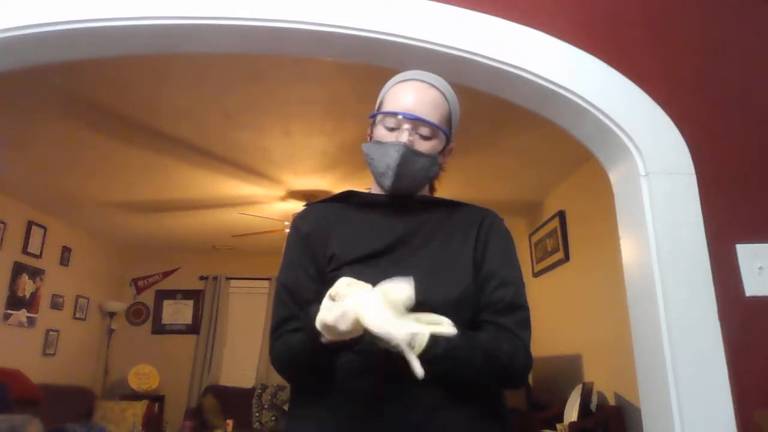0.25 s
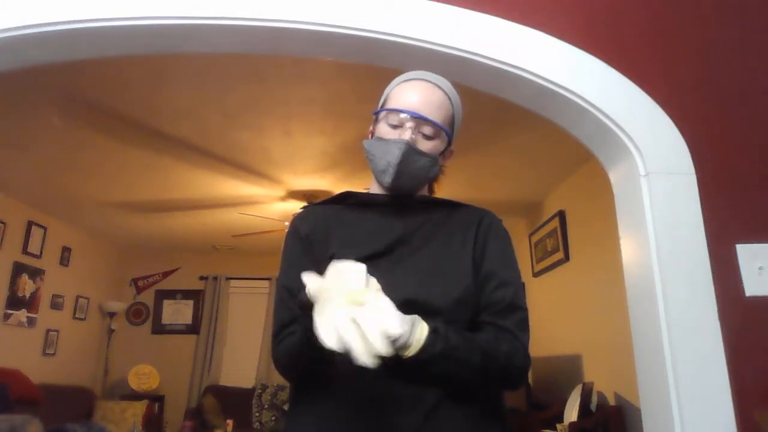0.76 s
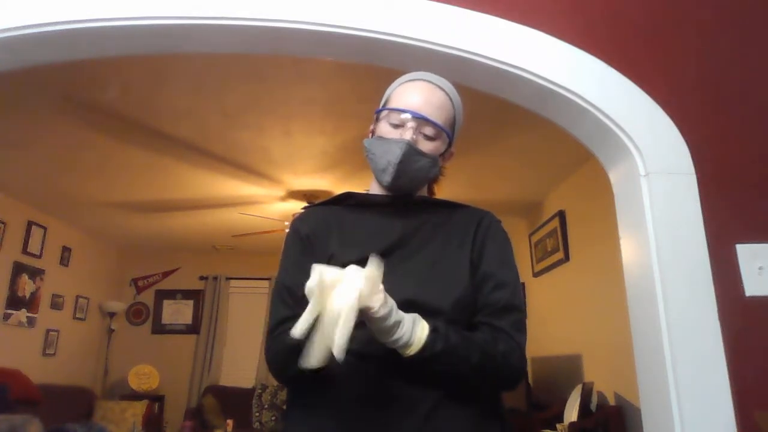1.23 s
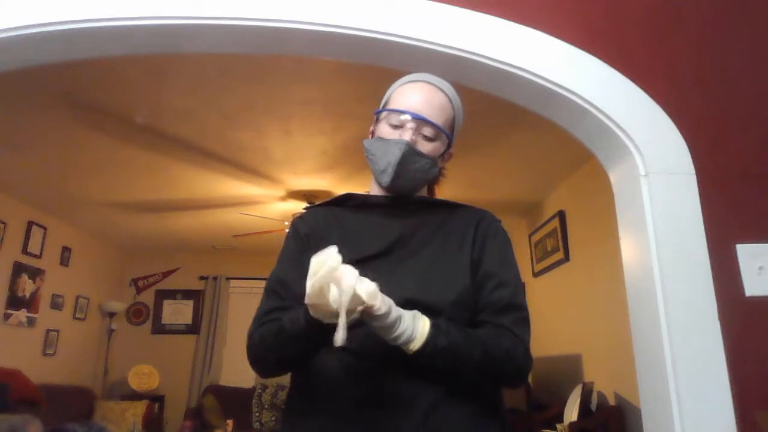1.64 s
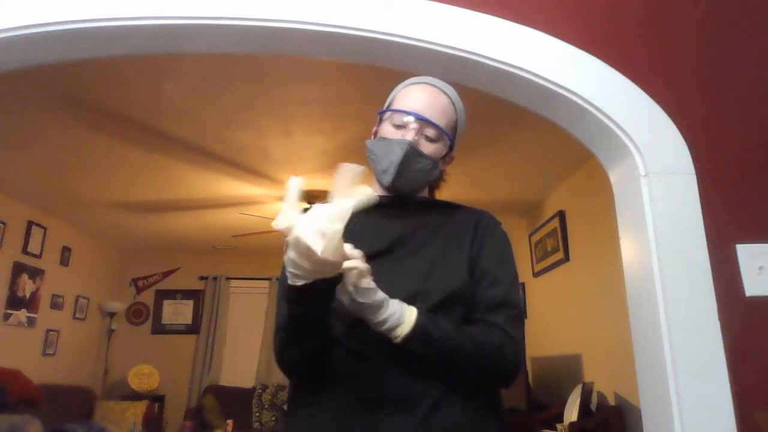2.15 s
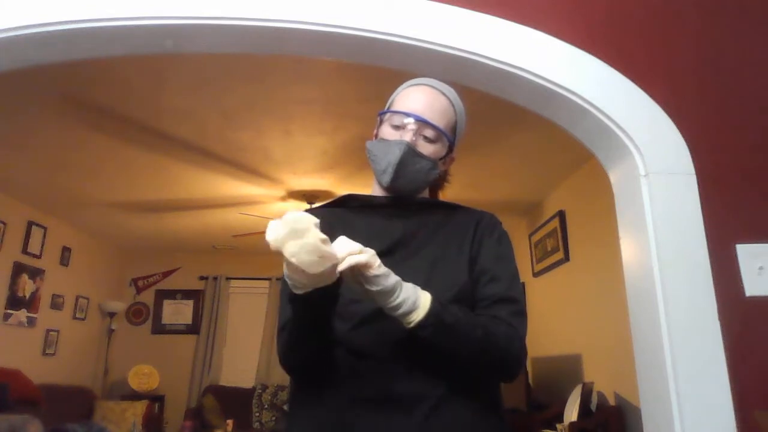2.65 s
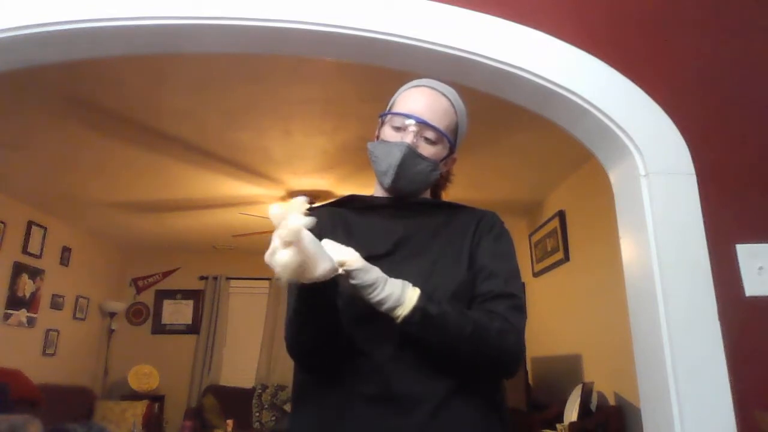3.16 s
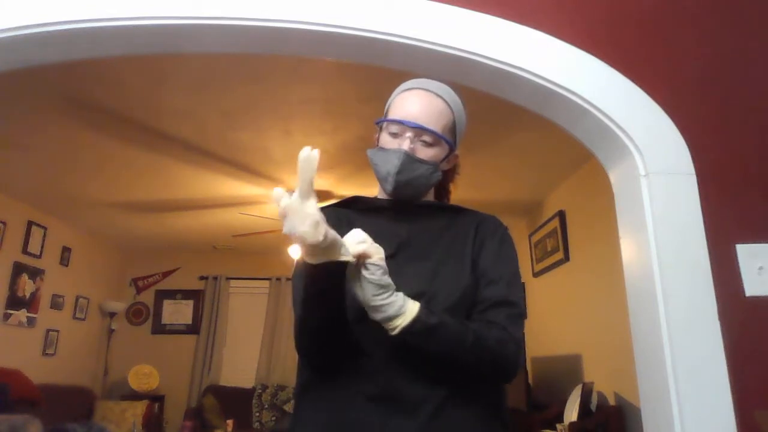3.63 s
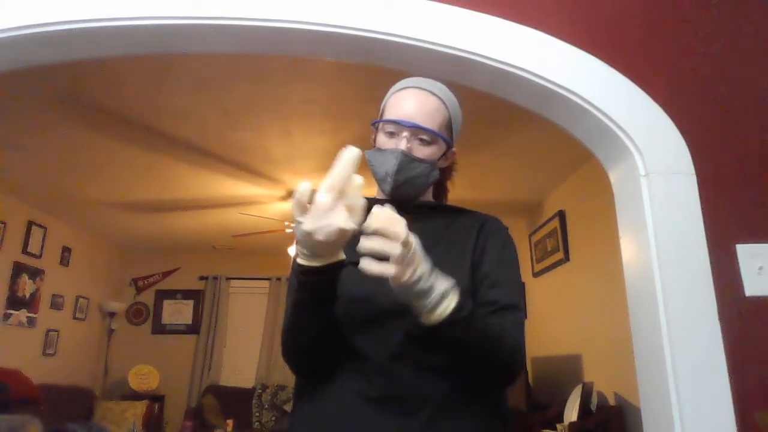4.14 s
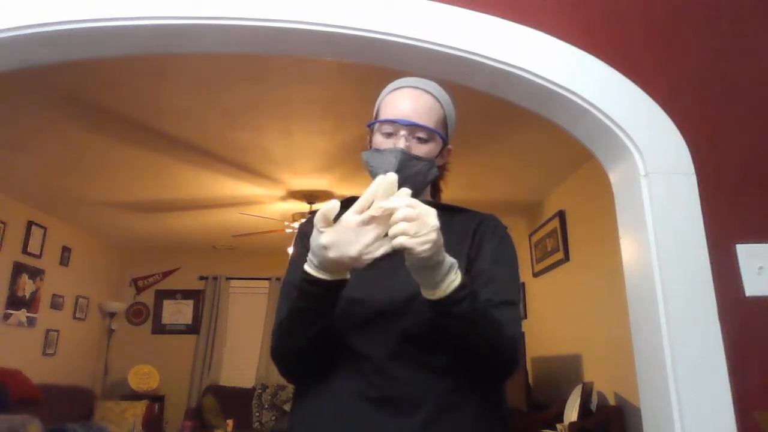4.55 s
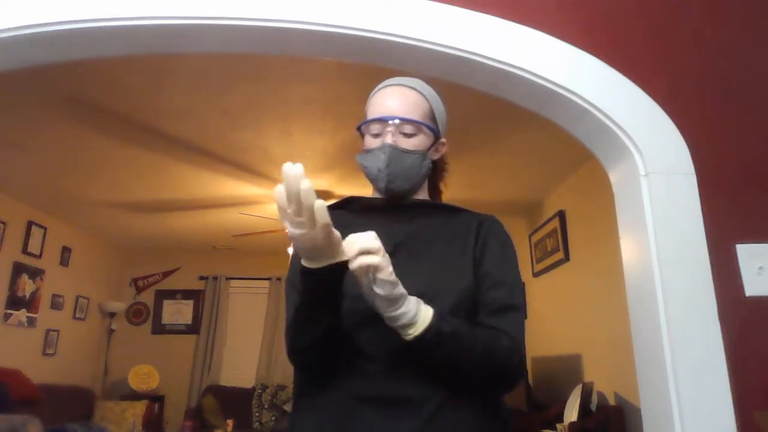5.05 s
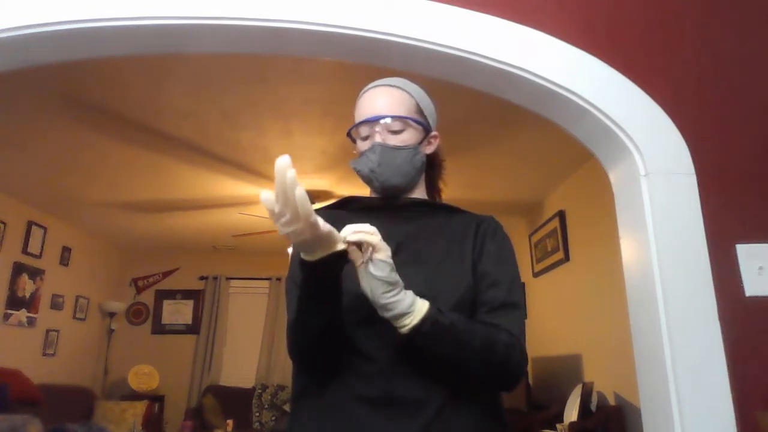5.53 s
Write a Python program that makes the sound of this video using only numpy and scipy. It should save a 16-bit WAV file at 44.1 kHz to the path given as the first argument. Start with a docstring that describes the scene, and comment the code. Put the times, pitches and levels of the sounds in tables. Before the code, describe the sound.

Thin rubber gloves hiss and crinkle as they are tugged over hands, with sharp stretchy snaps growing louder in a quiet, slightly reverberant room.

```python
"""Putting on thin rubber gloves

In a quiet living room with a low ventilation rumble, rubber slides over two hands, about a metre away.
Sliding is shaped noise with tiny random slips in it: it hisses and crinkles as each pull swells and fades.
Let go, the stretched rubber snaps back: short noise pulses with a ring and a puff, and the room rings.
Loose pockets of the glove flap softly: low notes that swell and die away."""
import sys
import numpy as np
from scipy import signal
from scipy.fft import rfft, irfft
from scipy.io import wavfile
from scipy.ndimage import uniform_filter1d

SR = 44100
rng = np.random.default_rng(int(sys.argv[2]) if len(sys.argv) > 2 else 0)


def master_out(mix):
    """Clip the mix to full scale and print it as 16-bit PCM to the path in sys.argv[1]."""
    frames = np.transpose(np.atleast_2d(mix))
    ceiling = np.clip(frames, -1, 1)
    pcm = np.round(ceiling * 32767).astype(np.int16)
    wavfile.write(sys.argv[1], SR, pcm)


N = 255515
TIME = np.arange(N) / SR


def gain_of(db):
    """Turns decibels into amplitude."""
    return 10 ** (np.asarray(db) / 20)


def evened(x):
    """Scales a sound to an rms (average strength) of 1."""
    return x / np.sqrt(np.mean(x ** 2) + 1e-20)


def read(points, hz):
    """Reads a table between its points, on a log-frequency axis."""
    f, value = np.transpose(points)
    return np.interp(np.log(hz + 1), np.log(f + 1), value)


def add(mix, s, sound):
    """Mixes a sound in, starting at s seconds."""
    part = mix[round(s * SR):][:len(sound)]
    part += sound[:len(part)]


def coloured(x, points):
    """Gives a full-length signal the colour of a spectrum table, at rms 1."""
    hz = np.fft.rfftfreq(N, 1 / SR)
    return evened(irfft(rfft(x) * gain_of(read(points, hz)), N))


def wander(per_s):
    """Smooth random drift of rms 1; a higher per_s (in Hz) drifts faster."""
    f = np.fft.rfftfreq(N, 1 / SR)
    slow = np.exp(-(f / per_s) ** 2)
    return evened(irfft(rfft(rng.standard_normal(N)) * slow, N))


def bump(hz, centre, octaves):
    """A resonance: a smooth peak of height 1 around a centre frequency."""
    return np.exp(-(np.log2(hz / centre) / octaves) ** 2)


# colour of the low rumble: f/Hz, relative level/dB
RUMBLE_COLOUR = [(15, -71), (25, -57), (70, -21), (88, -14.5), (108, -1.5), (135, -3), (172, -2.5),
                 (216, -11), (243, -18), (313, -22), (372, -16.5), (442, -29.5), (600, -39), (780, -46),
                 (1320, -120)]
# colour of the wash of air: f/Hz, relative level/dB
AIR_COLOUR = [(25, -30), (100, 1), (400, 0.5), (800, -2), (2000, -2.5), (6000, -8), (16000, -51)]


def ventilation(rumble_db=-53, hum_hz=109, hum_db=-59, sway=0.77, air_db=-68):
    """A low rumble with a hum that wavers in pitch and loudness, and a faint wash of air."""
    phase = 2 * np.pi * hum_hz * TIME + sway * wander(8.7)
    hum = evened(np.sin(phase) * (1 + sway * wander(14.4)))
    rumble = coloured(rng.standard_normal(N), RUMBLE_COLOUR)
    air = coloured(rng.standard_normal(N), AIR_COLOUR)
    return gain_of(rumble_db) * rumble + gain_of(hum_db) * hum + gain_of(air_db) * air


# the hands never quite let go: a light, continuous contact goes on, now stronger, now weaker
# (before the trims in sliding): t/s, hiss level/dB, duller rub level/dB
LIGHT_CONTACT = [(0, -47.5, -56.5), (1.1, -55.5, -61.5), (2.499, -57, -60), (2.75, -49.5, -54),
                 (3.4, -48, -54), (4.3, -58, -56.5), (5.101, -63, -61), (5.4, -62, -58), (5.7, -67, -60.5)]
# pulls that drag the rubber over the skin (before the trims in sliding):
# fastest moment t/s, swell time t/s, hiss level/dB, duller rub level/dB
PULLS_OVER_SKIN = [(.02, 0.053, -39, -69), (.30, 0.03, -43.5, -63), (0.492, 0.069, -39.5, -73),
                   (.62, 0.042, -45.5, -56.5), (.79, 0.064, -47.5, -57.5), (.97, 0.026, -46.5, -65),
                   (1.32, 0.14, -42, -60), (1.53, 0.13, -52, -57.5), (1.87, 0.054, -46.5, -61),
                   (1.95, 0.033, -51.5, -65), (2.1, 0.044, -38, -56), (2.188, 0.046, -36.5, -62),
                   (2.94, 0.061, -36, -71), (3.022, 0.079, -35, -52), (3.145, 0.028, -30, -48),
                   (3.201, 0.039, -30.5, -46), (3.319, 0.037, -39.5, -47.5), (3.58, 0.06, -44, -51.5),
                   (4.0, .09, -49.5, -53.5), (4.49, 0.04, -73, -51), (4.61, 0.075, -51.5, -52.5),
                   (4.85, 0.089, -47, -48.5), (5.71, 0.078, -56, -62)]
RELEASE = 1.24  # a pull dies away over this many swell times


def friction(rise_shape=1.46, fall_shape=1.17):
    """Strength of hiss and rub: each pull swells and dies away on top of the light contact."""
    times, *levels = np.transpose(LIGHT_CONTACT)
    power = gain_of([np.interp(TIME, times, db) for db in levels]) ** 2
    for s, swell, hiss_db, rub_db in PULLS_OVER_SKIN:
        u = (TIME - s) / swell  # negative before the fastest moment
        rise = abs(u) ** rise_shape
        fall = abs(u / RELEASE) ** fall_shape
        speed = np.exp(-np.where(u < 0, rise, fall))
        power = power + (gain_of([[hiss_db], [rub_db]]) * speed) ** 2
    return np.sqrt(power)


# colour of the bright hiss: f/Hz, relative level/dB
HISS_COLOUR = [(800, -62), (2200, -11), (3050, -15.5), (3750, -5.5), (5000, -4), (7000, -2), (8900, -3),
               (10300, -9.5), (12500, -8.5), (14200, -7), (16000, -14.5)]
# colour of the duller rub: f/Hz, relative level/dB
RUB_COLOUR = [(200, -27), (500, -10.5), (750, -5.5), (1200, 1), (1800, 4.5), (2400, 0.5), (3100, 0.5),
              (4000, 0), (6000, -29), (10000, -42)]


def sliding(hiss_db=-1, rub_db=-3, slips_per_s=2200, spread_db=3.0, crinkle=0.53):
    """Countless tiny slips make a hiss; larger ones stand out as crinkles, and the grip varies."""
    hiss_strength, rub_strength = friction()
    sizes = gain_of(spread_db * np.minimum(rng.exponential(1, N), 5))
    signed_sizes = sizes * rng.choice([-1, 1], N)
    happens = rng.random(N) < slips_per_s / SR
    slips = evened(signed_sizes * happens)
    grip = gain_of(0.6 * wander(45))
    # hiss and rub share the larger slips, each over its own noise
    hiss = coloured(rng.standard_normal(N) + crinkle * slips, HISS_COLOUR)
    rub = coloured(rng.standard_normal(N) + crinkle * slips, RUB_COLOUR)
    hiss = hiss * hiss_strength * gain_of(hiss_db)
    rub = rub * rub_strength * gain_of(rub_db)
    return grip * (hiss + rub)


# how fast the room's tail dies, by pitch: f/Hz, time to fall by 60 dB t/s
ROOM_DECAY = [(150, 1), (500, 0.79), (1500, 0.51), (4000, .42), (8000, 0.39), (15000, 0.21)]
# first reflections, from the archway and floor: delay t/s, gain (before the echo and room levels)
FIRST_ECHOES = [(.0049, .36), (.0058, 0.24), (.0068, 0.23), (0.0096, 0.28), (0.0131, .2)]


def room(wet_db, tail_db=4, echo_db=-3, gap=0.0041, early=0.41, early_fade=0.06):
    """Direct sound, a few reflections, then a dense tail whose bands die at their own speeds."""
    size = SR * 3 // 4
    hz, t, bands = signal.stft(rng.standard_normal(size), SR, nperseg=256)
    fading = gain_of(-60 * t / read(ROOM_DECAY, hz)[:, None])
    tail = signal.istft(bands * fading, SR, nperseg=256)[1][:size]
    t = np.arange(size) / SR
    # near walls crowd the start of the tail, which begins after a gap in seconds
    tail = tail * (t > gap) * (1 + early * np.exp(-t / early_fade))
    response = gain_of(wet_db + tail_db) * tail / np.linalg.norm(tail)
    response[0] += 1  # the direct sound
    for delay, gain in FIRST_ECHOES:
        response[round(delay * SR)] += gain * gain_of(wet_db + echo_db)
    return response


def causal(db):
    """Spectrum of the promptest pulse that has these levels."""
    mirrored = np.concatenate([db, db[-2:0:-1]])
    log_gain = np.log(gain_of(mirrored))
    return np.exp(np.conj(signal.hilbert(log_gain)))[:len(db)]


# basic colour of the snapping film of rubber: f/Hz, relative level/dB
FILM_COLOUR = [(40, -53), (150, -34), (400, -19.5), (750, -6.5), (1300, 0.5), (2300, 0.5), (3000, -2),
               (3900, 3), (5000, 1), (8800, 2), (11000, -1.5), (15000, 2)]
# pockets of air squeezed out under the film: f/Hz, width/octaves, level/dB (added to each snap's thump)
AIR_POCKETS = [(250, 0.34, 6), (410, 0.19, 2.5), (591, 0.23, 2), (960, 0.22, -8.5)]
SLAP_S = 0.00036  # time that the film takes to land


def snap(level_db, ring_hz, ring_db, thump_db, edge_hz,
         ring_octaves=0.37, scatter=0.2, scatter_fade=0.0038, steepness=4.9):
    """The film lands in a quick run of tiny slaps, rings briefly and squeezes out a puff of air."""
    size = 2048
    t = np.arange(size) / SR
    hz = np.fft.rfftfreq(size, 1 / SR) + 1  # 1 Hz up, to keep clear of zero
    landing = np.sqrt(t / SLAP_S) * np.exp(-t / SLAP_S)
    scattered = scatter * np.exp(-t / scatter_fade)  # hands and chest scatter the slap
    slaps = rfft(rng.choice([-1, 1], size) * (landing + scattered))
    # all bands are excited about alike
    slaps = slaps / np.sqrt(uniform_filter1d(abs(slaps) ** 2, size=21))
    film = gain_of(read(FILM_COLOUR, hz) + ring_db * bump(hz, ring_hz, ring_octaves))
    film = film / np.sqrt(1 + (hz / edge_hz) ** steepness)  # treble falls away above the edge
    puff = sum(gain_of(thump_db + db) * bump(hz, centre, width) for centre, width, db in AIR_POCKETS)
    pulse = irfft(slaps * causal(20 * np.log10(film + puff)))
    return gain_of(level_db) * pulse[:size // 2]


# stretched rubber slapping the skin, and a short squeak (the row at 1.3 s with an 880 Hz ring): # t/s, level/dB
# (before the shared lift in snaps), ring of the film f/Hz, # ring level/dB, thump of trapped air level/dB,
# treble edge f/Hz, room share level/dB
RUBBER_SNAPS = [(0.0101, -26.5, 6550, 13.5, -9, 14100, 0), (0.508, -19, 4650, 14, -23, 11100, -4),
                (0.522, -23, 4020, 2, -15, 9200, -10), (0.538, -24, 1600, 7, -10, 4000, -13),
                (0.6367, -24.5, 4200, 13.5, -16, 5000, -7.5), (1.285, -19, 1930, 4, -11, 5000, -0.5),
                (1.3, -28, 880, 24.5, -7, 4500, -5.5), (1.321, -27.5, 1550, 13.5, 1, 3000, -3),
                (1.376, -17, 5840, 8, -27, 8200, -5), (2.126, -26, 7600, 15, -32, 15000, 1),
                (2.1604, -12, 2400, 5, -16, 11140, -1), (2.164, -20, 7000, 15.5, -22, 11100, -6),
                (2.6028, -16, 2300, 10, -11, 9300, -2.5), (2.604, -21, 3040, 18, -18, 3520, -5),
                (3.7546, -15, 8800, 2.5, -17, 15500, -7), (3.764, -12.5, 3980, -1.5, -16, 12000, -2),
                (3.7926, -6.5, 1960, 3.5, -10, 12000, -7), (3.806, -2.5, 2040, 4, -29, 14900, -5.5),
                (3.8782, -11.5, 2650, 3, -4.5, 6760, -10), (4.0500, -4.5, 2330, 7, -24, 7400, -6),
                (4.072, -9.5, 2300, 5, -11, 6600, -5), (4.081, -13, 2500, 1, -9, 8700, -0.5),
                (4.6497, -4, 1620, 11, 2.5, 8000, -1.5), (4.6524, -15.5, 4060, 19.5, 3, 4450, -3.5),
                (5.055, -34.5, 5200, 11, 5, 5960, -3.5), (5.2394, -12.5, 1800, 4.5, -8.5, 8300, -1),
                (5.255, -11, 2600, 5.5, -35, 8400, -5.5), (5.3819, -22.5, 1340, 8.5, 10, 2180, -3),
                (5.7186, -4.5, 1700, 1.5, -7, 7950, 5), (5.73, -14, 3950, 17, -7, 4500, 2),
                (5.7583, 5, 3680, 4, -7, 9650, -2), (5.765, -5.5, 5830, 16, 7, 6960, -5)]


def snaps(level_db=6):
    """The hands turn between snaps, so each one gets its own room tail; level_db lifts them all."""
    out = np.zeros(N)
    for s, *blow, room_db in RUBBER_SNAPS:
        add(out, s, signal.fftconvolve(snap(*blow), room(room_db)))
    return gain_of(level_db) * out


# soft flaps of loose rubber: t/s, level/dB, f/Hz, swell time t/s
SOFT_FLAPS = [(0.196, -42, 116.4, 0.054), (4.164, -38.5, 158, 0.011), (5.326, -38.5, 489, 0.0032),
              (5.333, -33.5, 211, 0.0045), (5.426, -43, 170, 0.012), (5.528, -48, 348, 0.0091),
              (5.530, -53.5, 617, 0.0062), (5.761, -28, 307, 0.011)]


def flaps():
    """Slack rubber over a pocket of air gives a low, damped note."""
    out = np.zeros(N)
    t = np.arange(SR // 3) / SR
    for s, db, hz, swell in SOFT_FLAPS:
        shape = t / swell * np.exp(1 - t / swell)  # peaks at 1 after the swell time
        add(out, s, gain_of(db) * np.sin(2 * np.pi * hz * t) * shape)
    return out


def scene():
    """Gloves, room and ventilation, the same in both channels."""
    soft = signal.fftconvolve(flaps() + sliding(), room(wet_db=-12.0))[:N]
    mono = snaps() + soft + ventilation()
    return np.array([mono, mono])


EDGE_HZ = 16100  # the recorder's upper limit


def record(dry, ceiling=0.81):
    """A soft limiter rounds off the loudest peaks; then the recorder cuts the highest treble."""
    lowpass = signal.firwin(301, EDGE_HZ, window=("kaiser", 8), fs=SR)
    limited = dry / (1 + (dry / ceiling) ** 4) ** 0.25
    return signal.oaconvolve(limited, lowpass[None], "same")


dry = scene()
out = record(dry)
master_out(out)
```